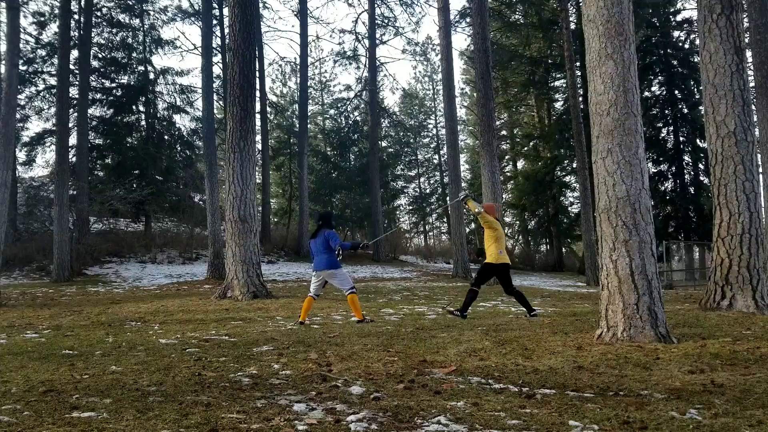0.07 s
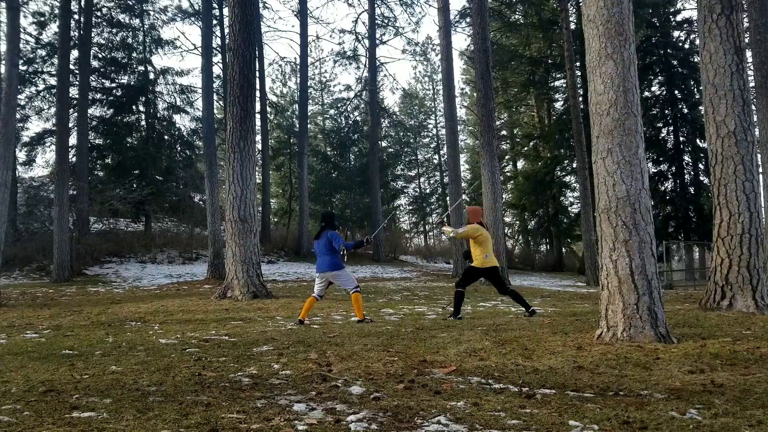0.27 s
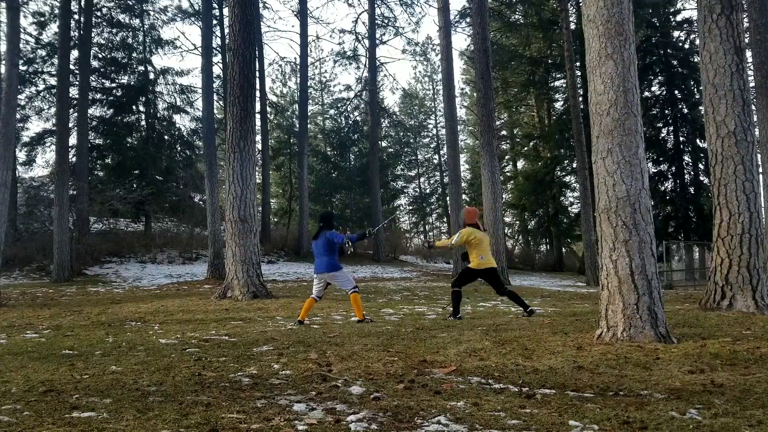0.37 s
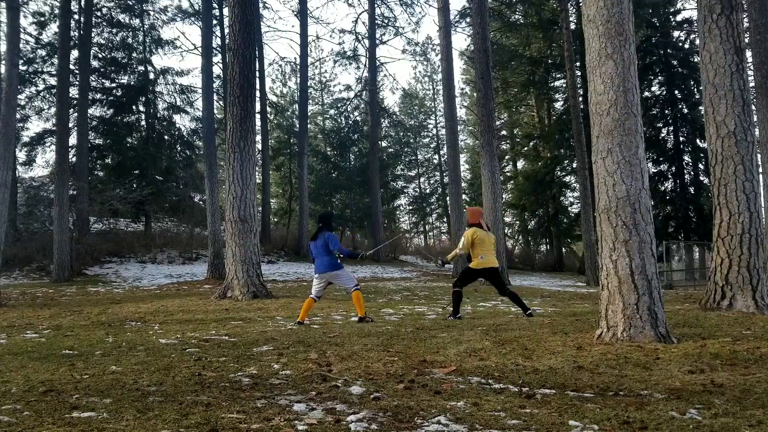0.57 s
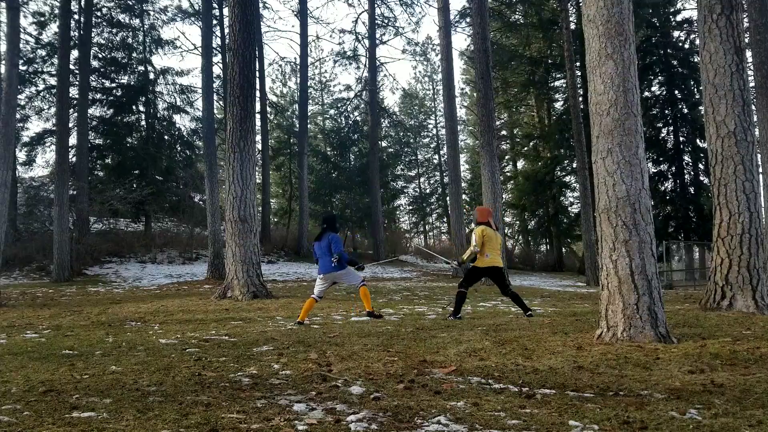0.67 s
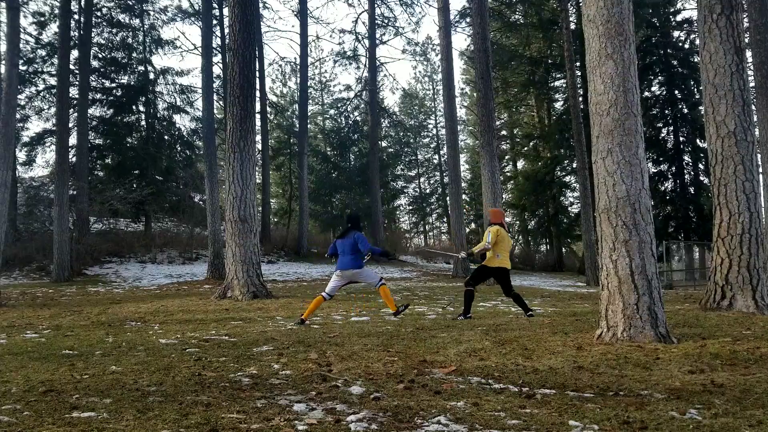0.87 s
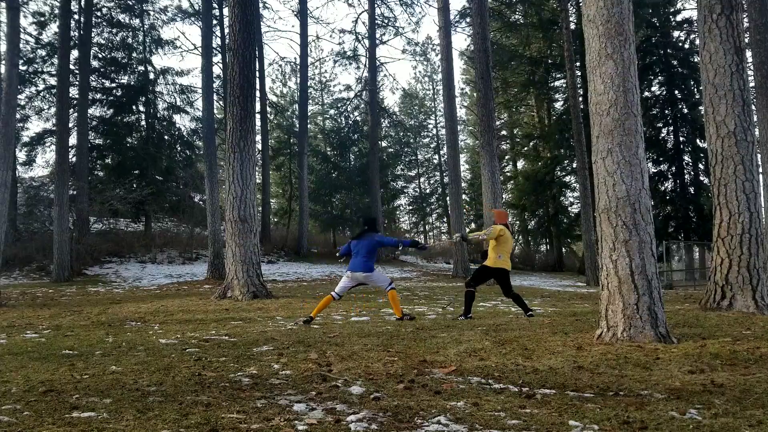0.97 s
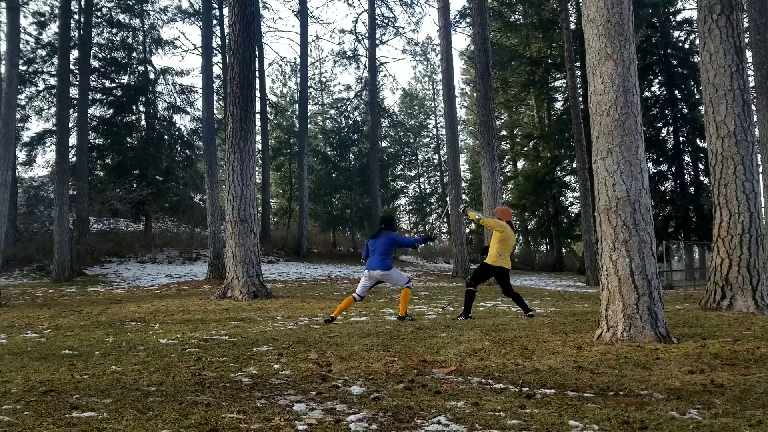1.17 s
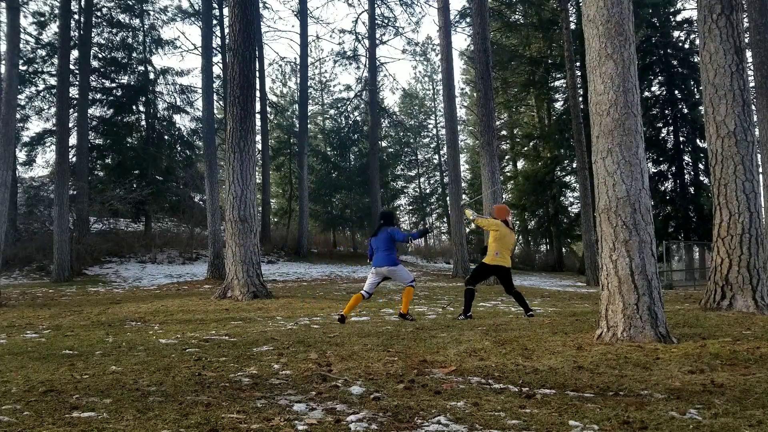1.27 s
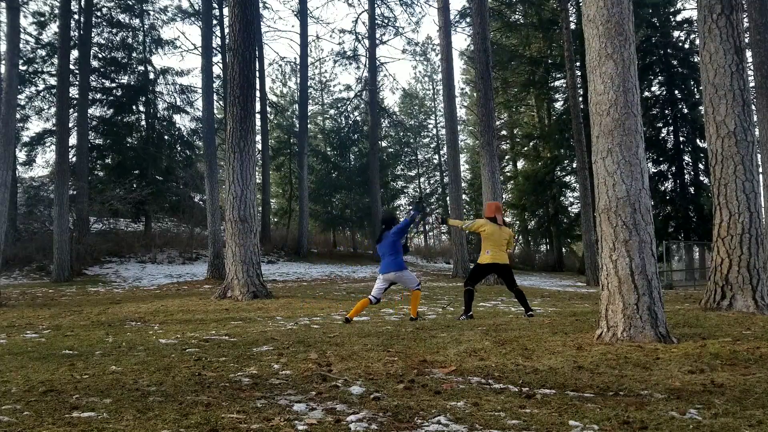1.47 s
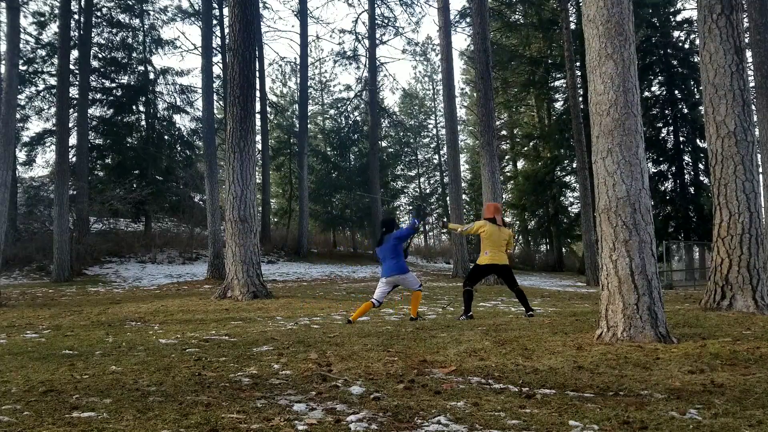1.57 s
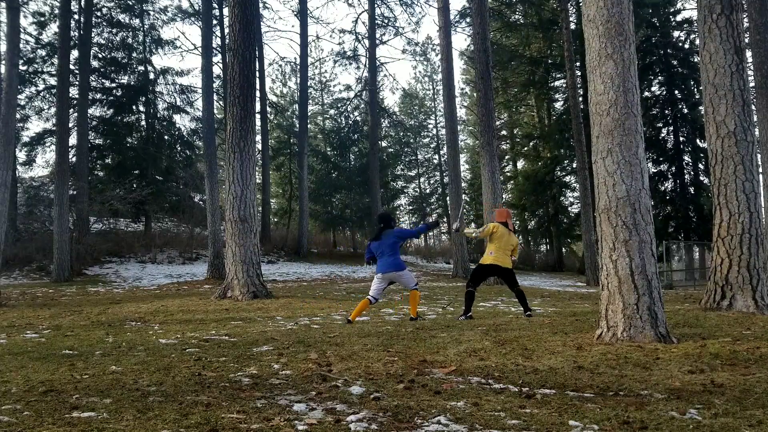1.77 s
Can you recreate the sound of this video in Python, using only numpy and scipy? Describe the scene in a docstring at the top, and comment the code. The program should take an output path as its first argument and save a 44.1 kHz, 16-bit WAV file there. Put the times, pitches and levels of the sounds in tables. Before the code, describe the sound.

Three short metallic sword clashes ring out among trees, with faint scrapes and distant rumble

```python
"""Steel blades meet in three short, damped clacks, as two fencers spar in a pine wood some way off.
Each contact is a set of fading steel tones plus a crack of noise; the first and last clacks chatter.
The trunks scatter the clacks into long, bright noise tails, and blade tones linger in the wood.
Grainy noise makes faint scrapes, gliding tones make squeaks, and two low tone pulses make a footfall.
Behind them, coloured noise makes a low, distant rumble and a faint rush of air."""
import sys
import numpy as np
from scipy import signal
from scipy.fft import rfft, irfft, next_fast_len
from scipy.io import wavfile
from scipy.ndimage import map_coordinates

SR = 44100
rng = np.random.default_rng(int(sys.argv[2]) if len(sys.argv) > 2 else 0)


def file_out(sig):
    """Save sig as 16-bit WAV at sys.argv[1]."""
    # one column per channel
    cols = np.atleast_2d(sig).T
    # limit, then scale
    lim = np.clip(cols, -1, 1)
    pcm = np.round(lim * 32767).astype(np.int16)
    wavfile.write(sys.argv[1], SR, pcm)


N = 81585  # length of the scene in samples


def amp(db):
    """Turn decibels into a gain."""
    return 10 ** (np.asarray(db) / 20)


def unit(x):
    """Scale a sound to an rms of 1."""
    return x / np.sqrt(np.mean(x ** 2) + 1e-20)


def along(points, hz):
    """Read a curve of (f/Hz, value) points, joined by lines on a log frequency axis."""
    f, value = np.transpose(points)
    return np.interp(np.log(hz + 1), np.log(f + 1), value)


def wobble(rate, size=N):
    """A smooth random curve through `rate` random points a second."""
    points = rng.standard_normal(int(size * rate / SR) + 4)
    return map_coordinates(points, [np.arange(size) * rate / SR])


def filtered(x, response):
    """Multiply the spectrum of x by a function of frequency."""
    m = next_fast_len(N + SR // 4)  # spare room, so the end does not wrap onto the start
    spectrum = rfft(x, m) * response(np.fft.rfftfreq(m, 1 / SR))
    return irfft(spectrum, m)[..., :N]


def pan(db):
    """Left and right gains whose levels differ by db (left minus right)."""
    return amp(np.array([[.5], [-.5]]) * db)


def since(start):
    """Seconds since start, zero before it."""
    return np.maximum(np.arange(N) / SR - start, 0)


def noise(spectrum, alike, treble_db=0, body_db=0):
    """Coloured stereo noise of rms 1; `alike` is the left-right likeness at each frequency."""
    def response(hz):
        turn = np.arccos(np.clip(along(alike, hz), -1, 1)) / 2
        # body below 1500 Hz, treble above 8500 Hz, almost no change between 3200 and 4800 Hz
        shelves = along([(1500, body_db), (3200, 0.0034), (4800, 0.023), (8500, treble_db)], hz)
        return amp(along(spectrum, hz) + shelves) * [np.cos(turn), np.sin(turn)]

    mid, side = filtered(rng.standard_normal((2, N)), response)
    return unit(np.array([mid + side, mid - side]))


# Blade contacts: t/s, relative level/dB, place on the blade (0-2), crack treble/dB, crack body/dB,
# ring/dB, echo/dB
BLADE_CONTACTS = [(0.4683, -13, 0, 2, 0, 1, 0.5), (0.4779, -22.5, 0, 0, -1, -2.5, 2.5),
                  (1.0787, -34.5, 1, 5, 6, 1.5, 0), (1.5369, -21.5, 2, 1, 2.5, 4.5, 1),
                  (1.5535, -24.5, 2, 0.5, 4.5, -10, 0), (1.590, -28.5, 2, 3.5, 9.5, -2, -5.5)]
# Ringing modes of the two blades: f/Hz, time to fall 60 dB/s,
# then relative level/dB when struck at place 0, at place 1, at place 2
BLADE_MODES = [(550, 0.043, -26, -24, -14.5), (1026, .06, -42.5, -0.5, -16.5), (1282, 0.06, -14.5, -3, -19),
               (1807, .04, -15.5, -11, -8.5), (2415, 0.062, -15.5, -20, -44), (3028, 0.034, -15, -1, -17),
               (3310, .06, -13, -27, -23), (3672, .04, -4.5, -12, -14), (3988, 0.04, -7, -17, -28),
               (4090, 0.028, -3.5, -27, -18), (4240, 0.055, -4.5, -17, -12.5),
               (4590, 0.079, -15, -26, -12.5), (5490, .035, -17, -11, -7), (5920, 0.021, -20.5, -37, -3),
               (6530, 0.031, -27, -30, -0.5), (7400, 0.089, -18.5, -6, -15), (7850, 0.12, -22.5, -8, -12),
               (8110, 0.053, -26, -13, -8.5), (8730, 0.079, -24, -11.5, -13.5),
               (10270, .045, -27.5, -4, -20), (11370, 0.055, -13, -7, -34)]
RING_DB, RING_ATTACK_S = -3, 0.0019
RING_BLUR_RAD, RING_SPLIT_RAD = 0.45, 0.32  # phase wander in time, phase spread between left and right


def blades():
    """Each contact rings the hand-damped modes, weighted by where the blade is struck."""
    out = np.zeros((2, N + SR))
    t = np.arange(SR // 5) / SR
    rise = 1 - np.exp(-(t / RING_ATTACK_S) ** 2)
    for start, db, place, _, _, ring_db, _ in BLADE_CONTACTS:
        first = round(start * SR)
        for hz, t60, *place_db in BLADE_MODES:
            level = db + RING_DB + ring_db + place_db[place]
            phase = rng.uniform(0, 2 * np.pi) + RING_SPLIT_RAD * rng.standard_normal((2, 1))
            phase = phase + RING_BLUR_RAD * wobble(250, len(t))
            tone = np.sin(2 * np.pi * hz * t + phase)
            out[:, first:first + len(t)] += amp(level - 60 * t / t60) * rise * tone
    return out[:, :N]


# Colour of the crack: f/Hz, relative level/dB
CRACK_COLOUR = [(150, -5.5), (450, -9.5), (1200, -0.5), (2200, -3), (4000, 2), (5200, 0.5), (7000, -3),
                (10000, -6), (14000, -5.5)]
# Left-right likeness of cracks and scrapes: f/Hz, likeness (1 = the same on both sides)
STEEL_LIKENESS = [(400, 0.77), (3000, .85), (7000, 0.32), (12000, .1)]
CRACK_DB, CRACK_ATTACK_S, CRACK_T60_S = -2, 0.0015, 0.033
RATTLE_DB, RATTLE_T60_S = -12.5, 0.12  # the hilts buzz on; level relative to the crack


def cracks():
    """Each contact is a sharp crack of noise with a weaker, slower-fading buzz of the hilts."""
    out = np.zeros((2, N))
    for start, db, _, treble_db, body_db, *_ in BLADE_CONTACTS:
        t = since(start)
        rise = 1 - np.exp(-(t / CRACK_ATTACK_S) ** 2)
        fade = amp(-60 * t / CRACK_T60_S) + amp(RATTLE_DB - 60 * t / RATTLE_T60_S)
        hiss = noise(CRACK_COLOUR, STEEL_LIKENESS, treble_db, body_db)
        out += amp(db + CRACK_DB) * rise * fade * hiss
    return out


# How long the echo among the trunks lasts: f/Hz, time to fall 60 dB/s
WOOD_FADE = [(300, 0.66), (1200, .7), (3000, 0.92), (6000, .65), (10000, 0.47), (14000, 0.5)]
# Colour of that echo: f/Hz, relative level/dB
WOOD_SPECTRUM = [(200, -11), (550, -5), (1200, 0), (2300, 2.5), (3000, 5.5), (3700, 3), (4300, 4),
                 (5000, 0), (7500, 2.5), (9500, 1), (11500, 3), (14400, -3.5)]
WOOD_DB, WOOD_PAN_DB, WOOD_RISE_S = -20, -4, 0.004
TRUNK_LUMP_DB = 0.7  # random unevenness from one short time frame to the next


def wood():
    """Countless trunks scatter each clack into a diffuse tail, unrelated left and right."""
    hiss = noise(WOOD_SPECTRUM, [(1000, 0)])
    hz, t, frames = signal.stft(hiss, SR, nperseg=256)
    t60 = along(WOOD_FADE, hz)[:, None]
    power = np.zeros(frames.shape[1:])
    for start, db, *_, echo_db in BLADE_CONTACTS:
        age = np.maximum(t - start, 0)
        rise = 1 - np.exp(-age / WOOD_RISE_S)
        power += (amp(db + echo_db - 60 * age / t60) * rise) ** 2
    lumps = amp(TRUNK_LUMP_DB * rng.standard_normal(len(t)))
    tail = signal.istft(frames * np.sqrt(power) * lumps, SR, nperseg=256)[1][:, :N]
    return amp(WOOD_DB) * pan(WOOD_PAN_DB) * tail


LINGER_DB, LINGER_T60_S = -16, 0.59


def linger(ring):
    """The wood keeps blade tones alive: the ring is smeared through a fading burst of noise."""
    t = np.arange(SR) / SR
    tail = rng.standard_normal((2, SR)) * amp(-60 * t / LINGER_T60_S)
    smeared = signal.fftconvolve(ring, tail / np.linalg.norm(tail[0]), axes=1)[:, :N]
    return amp(LINGER_DB) * pan(WOOD_PAN_DB) * smeared


# Thin squeaks of steel sliding on steel: t/s, level/dB, starting f/Hz, length/s
STEEL_SQUEAKS = [(1.226, -59.5, 11200, 0.018), (1.235, -60, 12800, 0.019), (1.259, -62, 13200, .012)]
SQUEAK_GLIDE_HZ_PER_S, SQUEAK_BLUR_RAD = 47000, 1.9


def squeaks():
    """Edge slides on edge: a thin tone that rises, roughened by a wandering phase."""
    out = np.zeros(N)
    for start, db, hz, length in STEEL_SQUEAKS:
        t = np.minimum(since(start), length)
        mean_hz = hz + SQUEAK_GLIDE_HZ_PER_S * t / 2
        phase = 2 * np.pi * mean_hz * t + SQUEAK_BLUR_RAD * wobble(700)
        out += amp(db) * np.sin(np.pi * t / length) * np.sin(phase)
    return out


# Faint scrapes of blades and gear: t/s, relative level/dB, length/s (the peak is halfway), treble/dB
SCRAPES = [(0.122, -71.5, 0.032, 9), (0.149, -60.5, 0.018, -2), (.378, -56, 0.026, 0),
           (.402, -58.5, 0.011, 5), (0.429, -62, .012, 0), (1.001, -61.5, 0.0075, -22),
           (1.127, -59, 0.015, -11), (1.225, -64.5, 0.035, 1), (1.286, -58, 0.011, 2),
           (1.317, -68, .06, 0.5), (1.397, -61.5, 0.037, 0), (1.434, -63.5, 0.085, 1),
           (1.837, -56.5, 0.0081, 3)]
# Colour of their hiss: f/Hz, relative level/dB
SCRAPE_COLOUR = [(300, 7.5), (1500, -4.5), (2500, -5.5), (4300, -4), (6100, -10), (8500, -3.5),
                 (9500, -6.5), (14000, -0.5)]
# Tones that a scrape draws from the steel: f/Hz, relative level/dB
STEEL_TONES = [(2870, -10), (4250, -10.5), (5380, -15), (8750, -18.5)]
TONE_WAVER_RATE = 110  # random points a second; more makes the tones rougher
SCRAPE_TAIL_DB, SCRAPE_TAIL_T60_S = -8.5, 0.28


def scrapes():
    """Brief grainy scrapes: hiss plus a few wavering steel tones, each with a faint tail."""
    out = np.zeros((2, N))
    tones = np.zeros(N)
    for hz, db in STEEL_TONES:
        tones += amp(db) * wobble(TONE_WAVER_RATE) * np.sin(2 * np.pi * hz * since(0))
    for start, db, length, treble_db in SCRAPES:
        t = since(start)
        u = 2 * t / length
        stroke = (u * np.exp(1 - u)) ** 2
        tail = (1 - np.exp(-u)) * amp(SCRAPE_TAIL_DB - 60 * t / SCRAPE_TAIL_T60_S)
        grain = amp(db + 2.9 * wobble(430))
        hiss = noise(SCRAPE_COLOUR, STEEL_LIKENESS, treble_db)
        out += grain * (stroke + tail) * (hiss + tones)
    return out


# Footfalls on the turf: t/s, level/dB, f/Hz, length/s (the peak is about a third of the way)
FOOTFALLS = [(1.4749, -31, 234, 0.016), (1.515, -27, 58.4, 0.073)]
STAMP_SWELL = 2.6  # how steeply a footfall swells


def stamps():
    """A lunge lands: a heel knock, then the dull thump of the ground, each a short tone pulse."""
    out = np.zeros(N)
    for start, db, hz, length in FOOTFALLS:
        t = since(start)
        u = np.pi * t / length
        out += amp(db) * (u * np.exp(1 - u)) ** STAMP_SWELL * np.sin(2 * np.pi * hz * t)
    return out


# Colour of the far rumble: f/Hz, relative level/dB
RUMBLE_COLOUR = [(15, -48), (25, -23), (31, -19.5), (40, -8.5), (50, -2), (70, -2), (110, -1), (150, -5.5),
                 (225, -8.5), (270, -14), (340, -21.5), (480, -35), (700, -70)]
# Left-right likeness of rumble and air: f/Hz, likeness (1 = the same on both sides)
FLOOR_LIKENESS = [(40, 0.87), (120, 0.98), (250, .9), (500, 0.43), (1000, 0.19), (2500, 0.14), (8000, .05)]
RUMBLE_DB, RUMBLE_SWING_DB = -42, 0.92


def rumble():
    """A low, far rumble: deep noise whose level drifts gently."""
    return amp(RUMBLE_DB + RUMBLE_SWING_DB * wobble(8.08)) * noise(RUMBLE_COLOUR, FLOOR_LIKENESS)


# Colour of distant traffic and treetops: f/Hz, relative level/dB
AIR_COLOUR = [(240, -36.5), (400, -10), (719, -7.5), (810, -1), (1030, -3), (1690, -9.5), (2860, -27),
              (3700, -31.5), (3870, -31.5), (8070, -58.5), (10400, -37), (14500, -30.5)]
AIR_DB, AIR_SWING_DB = -54, .3


def air():
    """A faint rush from distant traffic and treetops: noise whose level drifts slightly."""
    return amp(AIR_DB + AIR_SWING_DB * wobble(5.1)) * noise(AIR_COLOUR, FLOOR_LIKENESS)


# Side the background leans to: f/Hz, left minus right level/dB
BACKGROUND_PAN = [(40, -2), (250, -4), (1000, -7), (5000, -10), (13000, -0.5)]


def background():
    """Rumble and air together, leaning to one side by an amount that depends on frequency."""
    return filtered(rumble() + air(), lambda hz: pan(along(BACKGROUND_PAN, hz)))


# Side the direct sound leans to: f/Hz, left minus right level/dB
DIRECT_PAN = [(200, -3.5), (1200, -7.5), (3000, -12), (4800, -13.5), (6500, 3), (9000, 0.5), (14000, 0)]


def scene():
    """The fencers, their echo among the trees and the background."""
    ring = blades()
    fencers = ring + cracks() + squeaks() + scrapes() + stamps()
    direct = filtered(fencers, lambda hz: pan(along(DIRECT_PAN, hz)))
    return direct + wood() + linger(ring) + background()


TOP_HZ = 14600


def record(dry):
    """A very steep low-pass removes the treble above TOP_HZ."""
    return filtered(dry, lambda hz: 1 / np.sqrt(1 + (hz / TOP_HZ) ** 240))


dry = scene()
out = record(dry)
file_out(out)
```